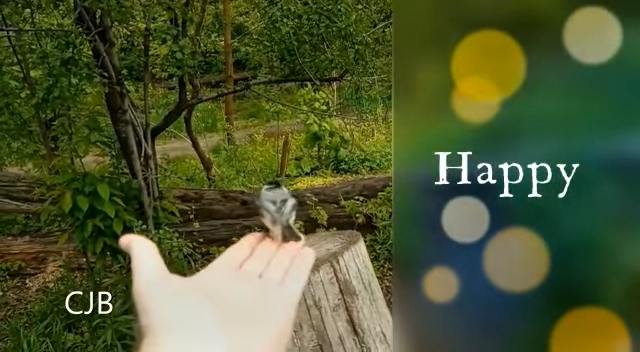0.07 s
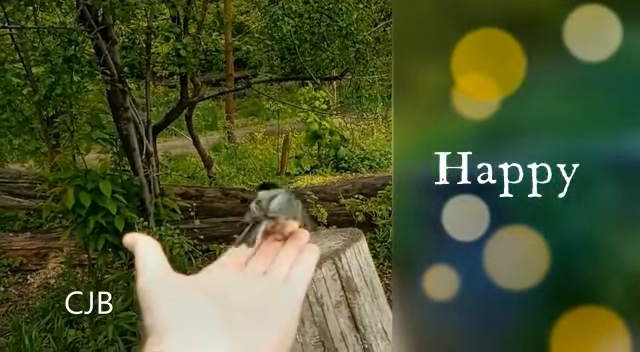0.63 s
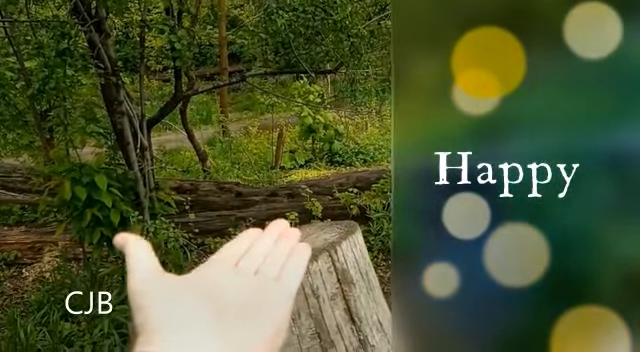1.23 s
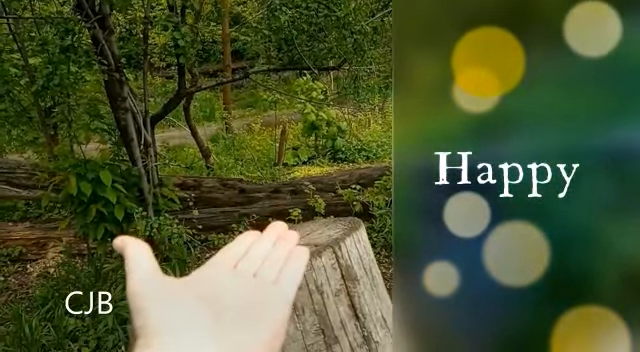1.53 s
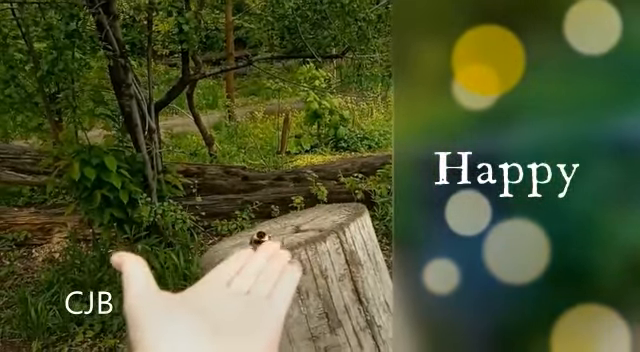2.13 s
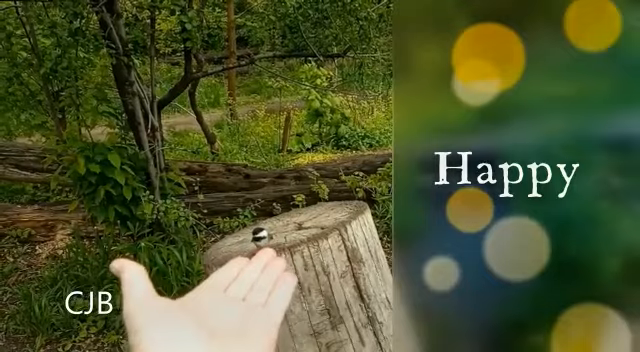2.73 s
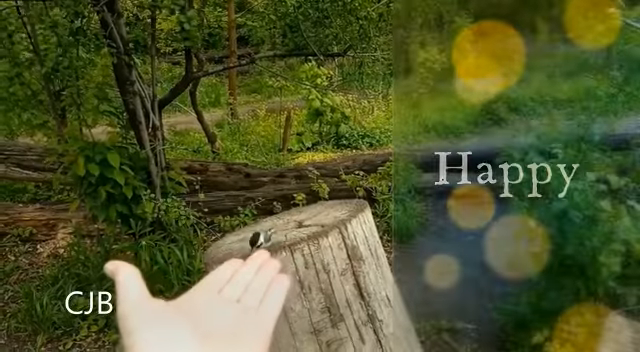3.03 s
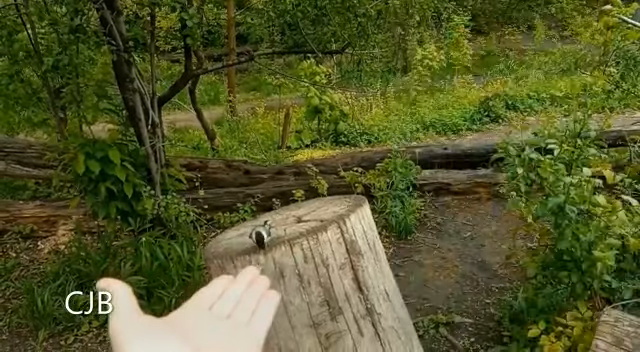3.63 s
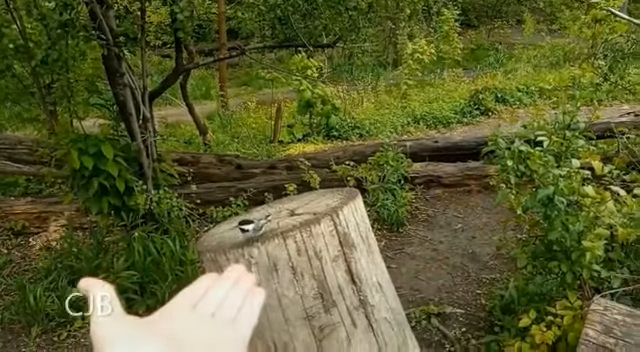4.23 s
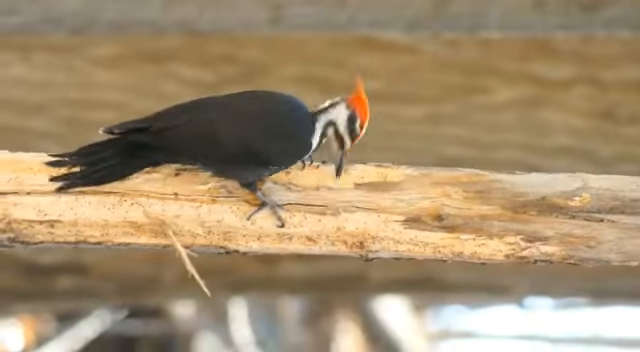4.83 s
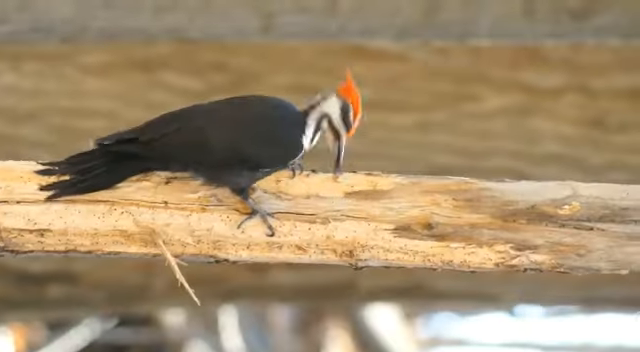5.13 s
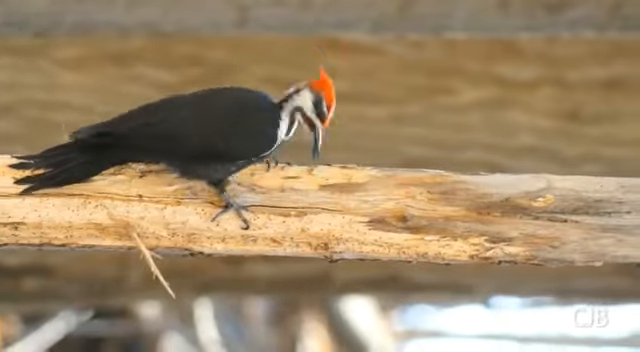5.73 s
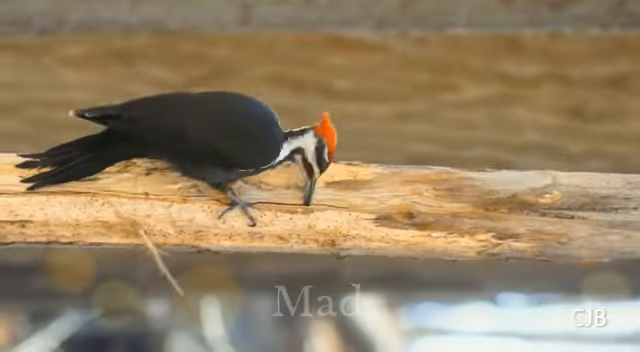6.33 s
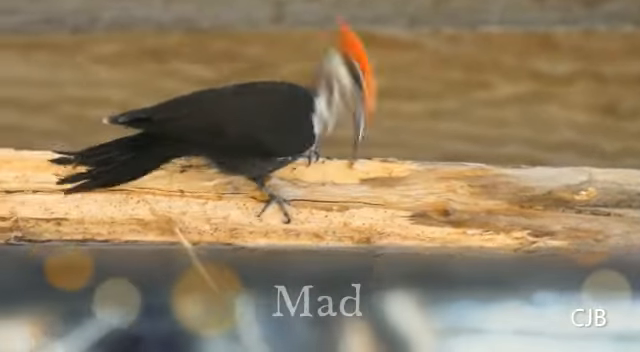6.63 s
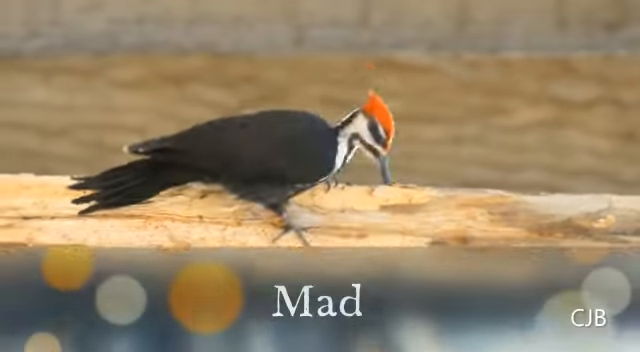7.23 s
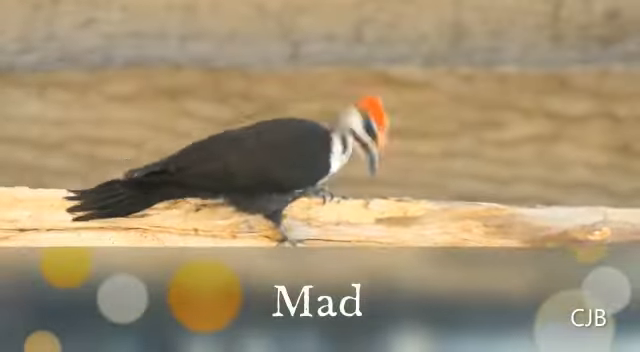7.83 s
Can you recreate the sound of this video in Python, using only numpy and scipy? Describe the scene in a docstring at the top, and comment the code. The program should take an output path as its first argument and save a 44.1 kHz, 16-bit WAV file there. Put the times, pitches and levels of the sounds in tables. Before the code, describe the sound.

A small bird calls nearby, slightly to the left, mixing sharp high chirps with buzzy, hoarse notes over a faint woodland hiss and distant rumble. Its wings whirr briefly between two bouts of calling. A little past halfway, the steady noise of a running stream takes over, with small drips and gurgles, and a woodpecker taps on dead wood about three times a second.

```python
"""A chickadee calls close by in a quiet wood. Its syrinx makes arched whistled chips, thin contact notes
and hoarse dees, shaped by the resonances of throat and beak; air whirrs through its wings. Behind it are a
hiss and a far rumble, and another bird calls once. The scene then changes to a rushing stream, where
trapped bubbles resonate and spray crackles, while a large woodpecker excites the modes of a dead log."""
import sys
import numpy as np
from scipy import signal
from scipy.fft import rfft, irfft
from scipy.io import wavfile

SR = 44100
rng = np.random.default_rng(int(sys.argv[2]) if len(sys.argv) > 2 else 0)


def persist_wave(psi):
    """Save psi, clipped to +-1, as 16-bit WAV."""
    counts = np.round(np.clip(psi, -1, 1) * 32767).astype(np.int16)
    wavfile.write(sys.argv[1], SR, np.atleast_2d(counts).T)


N = 347508
T = np.arange(N) / SR
STREAM_START_S = 4.705
EAR_LAG_S = .00012  # chips and dees reach the left ear this much later


def undb(db):
    """Decibels to amplitude ratio."""
    return 10 ** (np.asarray(db) / 20)


def unit(x):
    """Normalisation to rms 1."""
    return x / np.sqrt(np.mean(x ** 2))


def shape(points, hz):
    """Frequency response through (Hz, dB) points, falling 40 dB an octave past its ends."""
    f, db = np.transpose(points)
    octave, knots = np.log2(np.maximum(hz, 1)), np.log2(f)
    outside = np.abs(octave - np.clip(octave, knots[0], knots[-1]))
    return undb(np.interp(octave, knots, db) - 40 * outside)


def colour(x, points):
    """Linear filtering: the spectrum is multiplied by a (Hz, dB) response."""
    n = x.shape[-1]
    return irfft(rfft(x) * shape(points, np.fft.rfftfreq(n, 1 / SR)), n)


def lowpass(x, hz):
    """Steep elliptic low-pass filtering."""
    return signal.sosfilt(signal.ellip(10, .2, 70, hz, fs=SR, output="sos"), x)


def walk(rate_hz, n=N):
    """Random modulation: straight lines join Gaussian values drawn at the given rate."""
    position = np.arange(n) * rate_hz / SR
    count = int(position[-1]) + 2
    return 1.95 * np.interp(position, np.arange(count), rng.standard_normal(count))


def add(out, s, sound, pan_db=0, lag_s=0):
    """Interaural cues: a sound mixed in at time s is pan_db louder and lag_s later on the left."""
    part = undb(np.array([[pan_db], [-pan_db]]) / 2) * sound
    for ear, late in enumerate((lag_s, 0)):
        i = min(max(int(s * SR) + round(late * SR), 0), N)
        out[ear, i:i + part.shape[1]] += part[ear, :N - i]


def echoes(x, t60_s, level_db, delay_s):
    """Diffuse scattering from trunks and leaves: a decaying tail, different at each ear."""
    t = np.arange(SR) / SR
    tail = rng.standard_normal((2, SR)) * undb(-60 * t / t60_s) * (t > delay_s)
    tail /= np.sqrt(np.sum(tail ** 2, axis=1, keepdims=True))
    return undb(level_db) * signal.fftconvolve(x[:1], tail, axes=1)[:, :N]


def stereo_noise(side_spectrum):
    """Partial coherence: in-phase noise plus antiphase noise weighted by a (Hz, dB) spectrum."""
    mid, side = rng.standard_normal((2, N))
    return mid + np.array([[1], [-1]]) * colour(side, side_spectrum)


def whistle(hz, waver, flutter_db):
    """Frequency and amplitude modulation: a sine wavers randomly about a pitch curve."""
    phase = 2 * np.pi * np.cumsum(hz * (1 + waver * walk(1200, len(hz)))) / SR
    return np.sqrt(2) * np.sin(phase) * undb(flutter_db * walk(400, len(hz)))


def arch(n, start_hz, top_hz, end_hz, crest, bend=2.3):
    """Pitch glide: a slowing climb to the top, reached at the fraction crest of the note, then a sag."""
    u, crest = np.linspace(0, 1, n), np.clip(crest, .1, .95)
    climb = np.maximum(1 - u / crest, 0)
    sag = np.maximum((u - crest) / (1 - crest), 0)
    return top_hz + (start_hz - top_hz) * climb ** bend + (end_hz - top_hz) * sag ** 2


def envelope(n, attack_s, release_s):
    """Amplitude envelope with linear attack and release."""
    t = np.arange(n) / SR
    return np.minimum(t / attack_s, 1) * np.minimum((t[-1] - t) / release_s, 1)


# spectrum of the far rumble (frequency [Hz], level [dB])
RUMBLE_SPECTRUM = [(20, -10.5), (42, -7), (60, 0), (80, -11.5), (105, -20), (140, -26.5), (175, -35),
                   (250, -42)]
# its swell (time [s], relative level [dB])
RUMBLE_SWELL = [(0.0, -58.5), (0.72, -55), (0.78, -50.5), (2.09, -59), (3.51, -58.5), (4.27, -66.5),
                (4.34, -59.5), (4.6, -60.5)]


def rumble(gain_db=4):
    """Low-frequency noise, nearly in phase at both ears, swells and ebbs in the distance."""
    noise = unit(colour(stereo_noise([(20, -26.5), (60, -24), (250, -8.5)]), RUMBLE_SPECTRUM))
    return noise * undb(np.interp(T, *np.transpose(RUMBLE_SWELL)) + gain_db)


# spectrum of the air in the wood (frequency [Hz], level [dB])
HISS_SPECTRUM = [(120, -7.5), (190, -7), (255, -21.5), (340, -14), (500, -16), (720, -20.5), (1000, -12.5),
                 (1300, -11), (1900, -15), (2900, -3.5), (4200, -8.5), (6200, -6), (8000, -11),
                 (11000, -24)]
# background hiss, louder while the chickadee calls (time [s], relative level [dB])
HISS_SWELL = [(0, -64.5), (1.35, -64), (1.9, -70), (3.1, -69.5), (3.5, -66), (4.6, -70)]


def background_hiss(gain_db=10, flicker_db=.7):
    """Amplitude-modulated broadband noise: a soft hiss swells, ebbs and flickers slightly."""
    noise = stereo_noise([(200, -3), (700, -13), (1300, -3), (2000, 5.5), (3000, .5), (11000, 4.5)])
    level_db = np.interp(T, *np.transpose(HISS_SWELL)) + gain_db + flicker_db * walk(22)
    return unit(colour(noise, HISS_SPECTRUM)) * undb(level_db)


# dee notes (time [s], duration [s], top pitch [Hz], crest [0-1], relative level [dB], roughness [0-1])
DEE_NOTES = [(0.018, 0.12, 373, 0.91, -34.5, .17), (0.206, 0.14, 372.2, 0.6, -33.2, .22),
             (1.028, 0.193, 338.9, 0.39, -32, 0.18), (1.269, .17, 364.5, 0.96, -34.5, 0.78),
             (3.597, .175, 382, .75, -35, 0.26), (3.807, .175, 376.3, .55, -33.5, .19),
             (4.017, 0.12, 372.6, 0.69, -34, 0.24), (4.205, .15, 374.5, 0.61, -33.5, 0.25)]
# the two halves of the syrinx sing partials 10 and 11; their beating makes the rest
# (harmonic number, level [dB])
SYRINX_PARTIALS = [(4, -48), (5, -38), (7, -34), (8, -23), (9, -12), (10, -2), (11, 0), (12, -13),
                   (13, -19), (14, -28), (16, -25), (17, -32), (20, -29), (28, -48)]
# resonance of the throat (frequency [Hz], gain [dB])
THROAT_RESPONSE = [(1200, -6), (3000, -2), (3350, -5), (3700, 2), (4100, -3), (10500, -5)]
# air puffed through the open beak (frequency [Hz], level [dB])
BREATH_SPECTRUM = [(2200, -21.5), (2800, 0), (4800, 9), (5300, 1.5), (7500, -15.5), (10000, -29)]


def dees(start_hz=318.4, jitter=.02, hiss_share=.55, breath_db=-21, gain_db=2, swell_db=1):
    """Source and filter: the throat shapes the syrinx's harmonic buzz, which starts raspy, then locks."""
    out = np.zeros((2, N))
    for s, length, top_hz, crest, db, rough in DEE_NOTES:
        n = int(length * SR)
        end_hz = start_hz + .45 * (top_hz - start_hz)
        hz = arch(n, start_hz, top_hz, end_hz, crest)
        gain = envelope(n, attack_s=.023, release_s=.016)
        gain *= undb(db + gain_db + swell_db * np.linspace(0, 1, n))
        unrest = rough + np.exp(-np.arange(n) / SR / .018)
        phase = 2 * np.pi * np.cumsum(hz * (1 + jitter * unrest * walk(502, n))) / SR
        buzz = np.zeros(n)
        for k in np.arange(4, 29):
            strength = shape(SYRINX_PARTIALS, k) * shape(THROAT_RESPONSE, k * hz)
            buzz += strength * np.cos(k * phase + 2 * np.pi * rng.random())
        pulsed_noise = rng.standard_normal(n) * (1 + np.cos(phase))
        hiss = colour(pulsed_noise, [(k * hz.mean(), level) for k, level in SYRINX_PARTIALS])
        voice = unit(unit(buzz) + hiss_share * unrest * unit(hiss))
        breath = undb(breath_db) * unit(colour(rng.standard_normal(n), BREATH_SPECTRUM))
        add(out, s, gain * (voice + breath), pan_db=7, lag_s=EAR_LAG_S)
    return out


# thin contact notes (time [s], duration [s], pitch [Hz], level [dB])
CONTACT_NOTES = [(0.171, 0.065, 6040, -50.5), (0.206, 0.035, 9540, -55.5), (1.775, 0.067, 5950, -54),
                 (2.407, 0.064, 6210, -55.5), (2.695, 0.06, 6130, -54), (3.201, 0.077, 6010, -54.5),
                 (3.594, 0.18, 6000, -56), (4.173, 0.063, 6000, -51), (4.207, 0.037, 9600, -57.5)]


def contact_notes():
    """Soft, nearly pure tones of level pitch; slight random modulation makes them quaver."""
    out = np.zeros((2, N))
    for s, length, hz, db in CONTACT_NOTES:
        n = int(length * SR)
        gain = undb(db) * envelope(n, attack_s=.02, release_s=.015)
        add(out, s, gain * whistle(np.full(n, hz), waver=.005, flutter_db=3))
    return out


# whistled chips (time [s], duration [s], start pitch [Hz], top pitch [Hz], pitch before the plunge [Hz],
# crest [0-1], beak resonance [Hz], relative level [dB], left minus right [dB])
CHIP_NOTES = [(0.485, 0.082, 6120, 8290, 8200, .64, 7180, -16, 4),
              (.622, 0.061, 6210, 7590, 7550, .92, 7110, -10.5, 0.5),
              (0.734, .051, 5200, 6820, 6500, 0.91, 6530, -17, 6.5),
              (0.837, 0.042, 5200, 6650, 6300, 0.93, 5870, -20.5, 6.5),
              (0.934, .063, 5200, 6776, 5670, 0.6, 6890, -17, 7),
              (3.265, 0.076, 6420, 8080, 7860, 0.55, 7560, -17, 6),
              (3.398, 0.057, 6100, 7350, 6670, 0.76, 7250, -13, 4),
              (3.514, .031, 6740, 7630, 7450, .55, 7160, -20.5, 2)]
# the voice breaking as a chip plunges (frequency [Hz], level [dB])
SCRATCH_SPECTRUM = [(2800, -12.5), (4200, 5.5), (5600, 6.5), (7000, -7)]


def chips(bandwidth_hz=700, plunge_s=.009, plunge_depth=.45, scratch_db=-10.5, fade_db=-5):
    """Swept resonance: a whistle peaks as it crosses the beak's resonance, then plunges with a scratch."""
    out = np.zeros((2, N))
    for s, length, start_hz, top_hz, end_hz, crest, beak_hz, db, pan_db in CHIP_NOTES:
        n = int(length * SR)
        plunge = np.maximum(1 - np.arange(n)[::-1] / SR / plunge_s, 0)  # 0 to 1 over the last moments
        hz = arch(n, start_hz, top_hz, end_hz, crest) * (1 - plunge_depth * plunge ** 2)
        resonance = 1 / np.hypot(1, 2 * (hz - beak_hz) / bandwidth_hz)
        gain = envelope(n, attack_s=.008, release_s=.004) * undb(db + fade_db * np.linspace(0, 1, n))
        noise = unit(colour(rng.standard_normal(n), SCRATCH_SPECTRUM))
        scratch = undb(scratch_db) * np.sqrt(plunge) * noise
        tone = resonance * whistle(hz, waver=.003, flutter_db=1.13)
        add(out, s, gain * (tone + scratch), pan_db, EAR_LAG_S)
    return out


# wing strokes (time [s], half-width [s], level [dB])
WING_STROKES = [(0.555, 0.022, -46), (0.641, 0.032, -51), (0.84, 0.014, -43.5), (.87, 0.011, -40),
                (0.983, 0.024, -41), (1.767, 0.016, -40), (1.871, 0.017, -37), (1.965, 0.028, -56)]
# air passing through feathers (frequency [Hz], level [dB])
FEATHER_SPECTRUM = [(710, -57.5), (1200, -38.5), (1400, -53.5), (1570, -29), (2360, -22.5), (2820, -5),
                    (3120, -10), (5540, 1.5), (11000, -21), (14300, -51.5), (22000, -120)]


def wings():
    """Aerodynamic noise: air hisses through the feathers in a Gaussian pulse at each stroke."""
    out = np.zeros((2, N))
    strokes = sum(undb(db) * np.exp(-((T - s) / width) ** 2) for s, width, db in WING_STROKES)
    hiss = unit(colour(stereo_noise([(1000, -4), (11000, -.5)]), FEATHER_SPECTRUM))
    add(out, 0, strokes * hiss, pan_db=2)
    return out


def far_call(start_s=2.94, length_s=.14, hz=1100, level_db=-67, waver=.025):
    """Pitch jitter on three harmonics makes another bird's faint, distant call hoarse."""
    out, n = np.zeros((2, N)), int(length_s * SR)
    phase = 2 * np.pi * np.cumsum(hz * (1 + waver * walk(400, n))) / SR
    harmonics = .7 * np.sin(phase) + np.sin(2 * phase) + np.sin(3 * phase)
    add(out, start_s, undb(level_db) * harmonics * np.hanning(n))
    return out


# second voice (time [s], duration [s], start pitch [Hz], top pitch [Hz])
RASP_NOTE = (3.503, .058, 5150, 5800)


def rasp(level_db=-33):
    """Biphonation: the other half of the syrinx adds a rough whistle under the last chip."""
    s, length, start_hz, top_hz = RASP_NOTE
    out, n = np.zeros((2, N)), int(length * SR)
    hz = arch(n, start_hz, top_hz, start_hz, crest=.61)
    gain = undb(level_db) * envelope(n, attack_s=.019, release_s=.0099)
    add(out, s, gain * whistle(hz, waver=.035, flutter_db=2))
    return out


# long paths through the wood: a peak, above which leaves and air absorb (frequency [Hz], gain [dB])
FAR_PATH_RESPONSE = [(1000, -0.5), (3700, -2.5), (5600, 11), (6800, -8), (8200, -5), (11000, -15)]


def wood(cutoff_hz=10700):
    """Reverberation: the birds' direct sound and its near and far scatter, over rumble and hiss."""
    birds = chips() + rasp() + dees() + contact_notes() + wings() + far_call()
    near = echoes(birds, t60_s=.29, level_db=-10, delay_s=.0033)
    far = echoes(colour(birds, FAR_PATH_RESPONSE), t60_s=.75, level_db=-16, delay_s=.0067)
    return lowpass(birds + near + far + rumble() + background_hiss(), cutoff_hz)


# rushing water (frequency [Hz], level [dB])
STREAM_SPECTRUM = [(20, -8), (62, 2.5), (135, 2), (170, -3), (400, -0.5), (750, 0), (1100, 3.5),
                   (1450, -3.5), (1850, 0), (2800, -2), (3350, 1.5), (4400, -7.5), (7000, -13),
                   (16000, -17)]
# its stereo width (frequency [Hz], side minus mid [dB])
STREAM_WIDTH = [(40, -22), (150, -3.5), (1000, -3.5), (2500, -2), (3400, -3), (5500, 2), (7800, -1),
                (9500, 2.5), (16000, -1)]


def rush(level_db=-33.5, flicker_db=2, surge_db=.4):
    """Incoherent summation: countless far bubbles merge into noise whose bands flicker separately."""
    spectrum = rfft(unit(colour(stereo_noise(STREAM_WIDTH), STREAM_SPECTRUM)))
    octave = np.log2(np.maximum(np.fft.rfftfreq(N, 1 / SR), 1))
    out = np.zeros((2, N))
    for centre in np.arange(4, 14.6, .5):  # half-octave steps from 16 Hz
        band = irfft(spectrum * np.maximum(1 - 2 * np.abs(octave - centre), 0), N)
        out += band * undb(flicker_db * walk(45))
    return out * undb(level_db + surge_db * walk(14))


def bubble(hz, cycles, rise):
    """Damped oscillation: a trapped air bubble rings down by 40 dB while its pitch rises."""
    u = np.linspace(0, 1, int(cycles * SR / hz) + 2)
    phase = 2 * np.pi * np.cumsum(hz * (1 + rise * u)) / SR
    return np.sin(phase) * undb(-40 * u) * (1 - np.exp(-u * cycles))


def bubbles(count=2200, level_db=-39, spread_db=3.5, low_hz=600, high_hz=6000):
    """Bubble resonance: nearer bubbles of every size ring at random times across the stream."""
    out = np.zeros((2, N))
    for when, pitch, rarity, ring, place in rng.random((count, 5)):
        s = STREAM_START_S + when * (T[-1] - STREAM_START_S)
        hz = low_hz * (high_hz / low_hz) ** pitch
        strength = undb(-spread_db * np.log(max(rarity, .02)))  # a few stand out
        gain = strength * shape(STREAM_SPECTRUM, hz) * np.sqrt(hz / low_hz)
        add(out, s, gain * bubble(hz, cycles=24 * (.5 + ring), rise=.076), pan_db=16 * (place - .5))
    return out * undb(level_db) / np.std(out[:, T > STREAM_START_S])


def spray(rate_hz=700, spread_db=4, level_db=-45):
    """Shot noise: tiny splashes arrive as random impulses and crackle in the treble."""
    size = undb(spread_db * np.minimum(rng.exponential(size=N), 5))
    splashes = size * (rng.random(N) < rate_hz / SR)
    clicks = splashes * (rng.choice([-1, 1], N) + .42 * rng.standard_normal((2, N)))
    crackle = colour(clicks, [(2000, -5.5), (3500, 10), (6000, 6.5), (10000, .5), (16000, 1)])
    return undb(level_db) * unit(crackle)


# blows of the beak (time [s], crack gain [dB], thud gain [dB], crack brightness [Hz])
PECK_BLOWS = [(4.861, -6.5, -13, 5800), (5.126, -15, -16.5, 8140), (5.386, -10.5, -9.5, 5770),
              (5.6996, -9.5, -11.5, 7560), (6.0437, -13, -6.5, 4070), (6.3763, -7, -6.5, 6000),
              (6.762, -10, -3.5, 4020), (7.108, -10, -4.5, 4050), (7.6423, -11, -5, 4030)]
# modes of the dead log (frequency [Hz], relative level [dB], 60 dB decay time [s])
LOG_MODES = [(196, -12.5, 0.097), (291.5, 1, 0.077), (378, 0, 0.057), (612, -1.5, 0.024), (747, 1, 0.025),
             (918, -8, 0.049), (1099, -5.5, 0.08), (1280, -30, 0.033), (1680, 0.5, 0.052),
             (1838, 3.5, 0.049), (2055, -8.5, 0.021), (2655, 6, 0.015), (2820, -5, 0.0095),
             (3670, -6, 0.025)]


def woodpecker(crack_s=.0027, crush_s=.0033, thud_delay_s=.0046, log_db=-16, crush_db=-5.5, pan_db=2.5):
    """Impact excites modes: the beak cracks the surface, the head's weight drives it in, the log rings."""
    out, t = np.zeros((2, N)), np.arange(SR // 5) / SR
    ring = sum((-1) ** k * undb(log_db + db - 60 * t / t60) * np.sin(2 * np.pi * hz * t)
               for k, (hz, db, t60) in enumerate(LOG_MODES))
    for s, crack_db, thud_db, bright_hz in PECK_BLOWS:
        fibres = rng.standard_normal((3, len(t)))  # one shared noise, one for each ear
        splinter = (fibres[0] + .5 * fibres[1:]) * np.exp(-t / crack_s)
        crack = colour(splinter, [(400, -3), (1800, 2), (3500, 3), (bright_hz, -6), (16000, -15)])
        add(out, s, undb(crack_db) * crack, pan_db)
        add(out, s, .28 * undb(thud_db) * ring, pan_db)  # first contact rings the log lightly
        crush = colour(fibres[0] * np.exp(-t / crush_s), [(200, 5.5), (1800, 2), (6000, -10.5)])
        add(out, s + thud_delay_s, undb(thud_db) * (ring + undb(crush_db) * crush), pan_db)
    return out + echoes(out, t60_s=.19, level_db=-7, delay_s=.0046)


# the nearest drops and gurgles (time [s], pitch [Hz], level [dB])
NEAR_DROPS = [(5.15, 574, -27), (5.865, 1880, -23), (5.884, 3480, -19), (5.896, 3160, -22.5),
              (5.914, 845, -24.5), (6.126, 3190, -22), (6.253, 3320, -16), (6.254, 4280, -26),
              (6.353, 3360, -20), (6.432, 5500, -18.5), (6.465, 2780, -20), (6.569, 3000, -15.5),
              (6.828, 3320, -18.5), (7.024, 3380, -26), (7.216, 3830, -19), (7.547, 3280, -21),
              (7.857, 1284, -22.5)]


def drops(slap_db=-7, slap_s=.0048):
    """Air entrainment: a close drop slaps the surface and traps one ringing bubble."""
    out, t = np.zeros((2, N)), np.arange(SR // 20) / SR
    for s, hz, db in NEAR_DROPS:
        burst = rng.standard_normal(len(t)) * np.exp(-t / slap_s)
        slap = colour(burst, [(1000, -7), (3500, 9), (7000, -5.5), (16000, -7)])
        add(out, s, undb(db + slap_db) * slap)
        add(out, s, undb(db) * bubble(hz, cycles=48, rise=.081))
    return out


def scene(fade_s=.066):
    """Superposition: the wood crossfades quickly into the stream with its woodpecker."""
    change = np.clip((T - STREAM_START_S) / fade_s + .5, 0, 1) ** 2
    water = np.zeros((2, N))
    add(water, 0, rush() + bubbles() + drops() + spray(), pan_db=1.17)
    return wood() * (1 - change) + (water + woodpecker()) * change


def record(dry):
    """Band limiting: the highest treble is cut off."""
    return lowpass(dry, hz=15900)


dry = scene()
out = record(dry)
persist_wave(out)
```